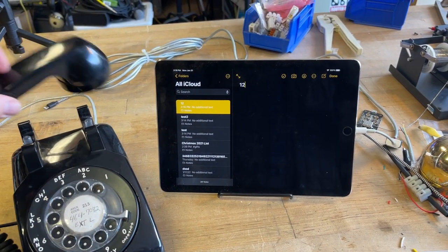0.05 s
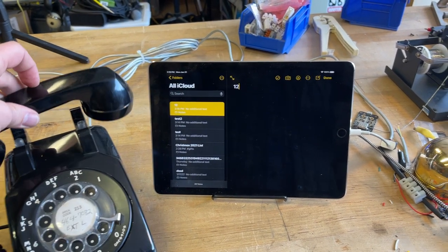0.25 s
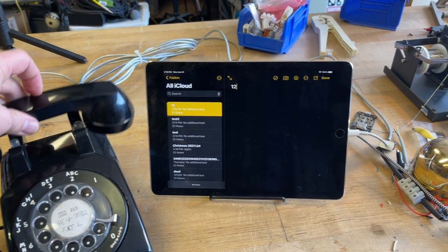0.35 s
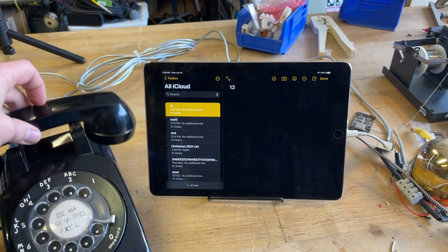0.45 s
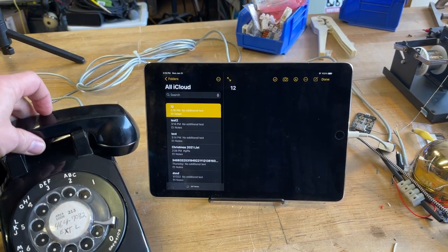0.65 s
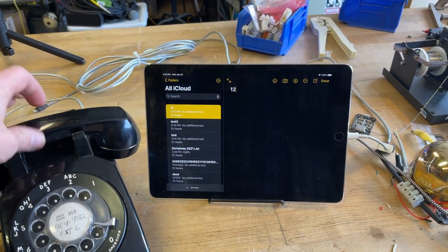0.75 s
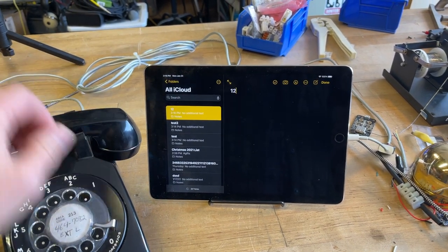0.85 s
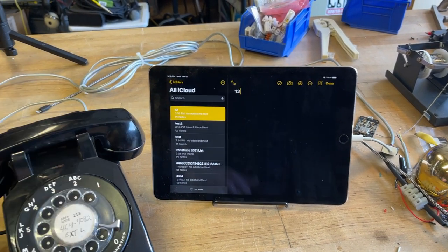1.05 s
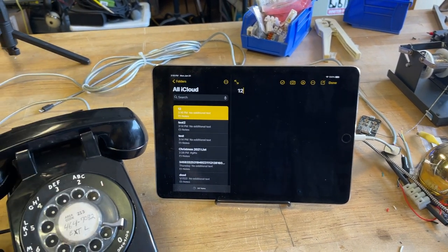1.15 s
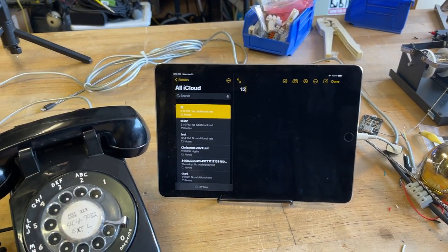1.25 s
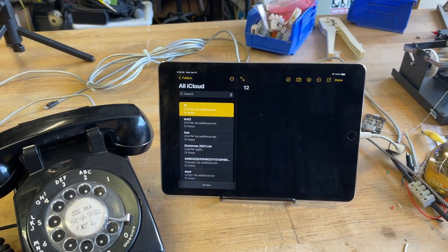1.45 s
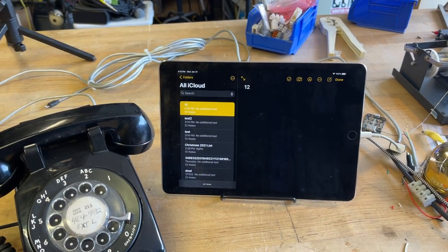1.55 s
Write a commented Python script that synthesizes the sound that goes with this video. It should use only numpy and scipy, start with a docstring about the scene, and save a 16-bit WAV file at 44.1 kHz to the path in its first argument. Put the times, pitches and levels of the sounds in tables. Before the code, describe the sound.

A heavy hollow plastic telephone handset is set down on its cradle: two sharp clacks, a cluster of smaller knocks and light rubbing, then quiet low room rumble, recorded close in stereo in a workshop.

```python
"""Telephone handset set down on its cradle

A heavy plastic handset is set down on its cradle on a wooden workbench: it knocks twice, scuffs over
the plungers, drops home and rocks to rest. Each knock rings the hollow shell with one push, while a quick
chatter of contacts rings small hard parts and cracks. The bench booms, noisy wakes follow the knocks and
rubbing is made of tiny slips. The room adds a dying tail, and a low rumble fills the workshop."""
import sys
import numpy as np
from scipy import signal
from scipy.fft import rfft, irfft, next_fast_len
from scipy.io import wavfile
from scipy.ndimage import uniform_filter1d

SR = 44100
rng = np.random.default_rng(int(sys.argv[2]) if len(sys.argv) > 2 else 0)


def wrap_up_sound(samples):
    """Save the sound to the file named by the first command line argument, as 16-bit audio."""
    columns = np.atleast_2d(samples).T
    # keep every value between -1 and 1, then stretch to whole-number steps
    tamed = np.clip(columns, -1, 1)
    steps = np.round(tamed * 32767).astype(np.int16)
    wavfile.write(sys.argv[1], SR, steps)


def decibels_to_gain(level_db):
    """Convert a level in decibels to a linear amplitude gain (20 dB per decade)."""
    exponent = np.asarray(level_db, float) / 20
    return 10 ** exponent


N = 70560  # length in samples (1.6 s)
SIZE = next_fast_len(N + SR)  # filter length, with space for tails
HZ = np.maximum(np.arange(SIZE // 2 + 1) * SR / SIZE, 1)

# Knocks on the cradle, a level for each pitch group:
# start_s, low_shell_db, upper_shell_db, middle_db, crack_db
KNOCKS = [(0.156, -57, -60.5, -53, -69.5), (0.244, -13, -14, -18, -21.5), (0.246, -15, -18, -36, -29),
          (0.255, -27.5, -32, -38, -23.5), (0.262, -28, -30, -34, -35), (0.436, -23.5, -20.5, -13.5, -26),
          (0.44, -11, -16, -31.5, -30), (0.442, -31.5, -30.5, -23, -32), (0.449, -30, -43, -33, -36),
          (0.584, -32, -28.5, -33.5, -40.5), (0.585, -24.5, -29.5, -21.5, -42),
          (0.619, -36, -47.5, -43.5, -52), (0.635, -39.5, -54, -34.5, -41.5),
          (0.696, -29, -42, -28.5, -46.5), (0.698, -33.5, -37, -42, -63), (0.75, -43.5, -21.5, -22, -27),
          (0.751, -13.5, -29, -23.5, -28.5), (0.761, -31.5, -31, -32.5, -36.5),
          (0.803, -54.5, -21.5, -23.5, -51), (0.804, -17, -23.5, -16.5, -31.5),
          (0.849, -24.5, -28, -30.5, -47), (0.853, -25.5, -22.5, -23, -43), (0.877, -30.5, -35, -32, -66),
          (0.896, -31.5, -42.5, -42, -62.5), (0.951, -26.5, -32, -38, -76), (1, -29.5, -33.5, -39.5, -69.5)]
# The pitch groups meet at these frequencies
UPPER_FROM_HZ, MIDDLE_FROM_HZ, HARD_FROM_HZ = 490, 750, 1800

# Ringing tones of the hollow shell and base: pitch_hz, level_db (relative), t60_s (time to fall 60 dB)
SHELL_TONES = [(300, -13, 0.0097), (348.5, -1.5, 0.054), (429, 3.5, 0.027), (557, 2.5, 0.039),
               (593, 1, 0.043), (654, -1, .035), (810, -10.5, 0.058), (889, 3.5, 0.028), (1003, 1, 0.054),
               (1046, 2, 0.032), (1174, -5, 0.017), (1490, -15, .018), (1662, -4.5, 0.014)]
# Ringing tones of small hard parts of the cradle: pitch_hz, level_db (relative), t60_s
HARD_TONES = [(2050, 2, 0.011), (2280, -19, .015), (2860, 3, 0.0055), (3260, -3, 0.01), (4500, -15, .012),
              (5940, -10, 0.036), (6330, -10.5, 0.021), (8000, -10, 0.005), (9300, -15, .012),
              (10400, -8, .01)]
# Added to the tone levels
SHELL_DB, UPPER_DB, MIDDLE_DB, HARD_DB = -3.5, -2.5, -3, -2
TONE_SPREAD_DB = 3  # random level change of each tone, knock by knock

# Colour of the crack noise: pitch_hz, level_db (per Hz, relative)
CRACK_COLOUR = [(880, -15), (1500, -1), (2240, -2), (3770, -14), (4550, -12), (6900, -20), (7540, -16.5),
                (11200, -19.5), (12500, -28.5), (16200, -67), (22000, -120)]
CRACK_T60_S = 0.03
CHATTER_S, CONTACT_DROP_DB = 0.0033, 14  # longest delay of a contact; most it can be weakened

# Small modes of base and bench top that blur into a dying noise: low_hz, high_hz, level_db, t60_s
BLUR_BANDS = [(270, 542, -9.5, 0.1), (463, 645, -9, 0.081), (770, 2080, -12, 0.15),
              (1800, 3000, -10.5, 0.14), (2570, 4900, -17.5, .08), (3830, 4000, -20, 0.063),
              (8230, 9300, -23, 0.17)]

# Booming tones of the bench: pitch_hz, level_db (relative to the push on the shell), t60_s
BENCH_TONES = [(104.9, -22.5, 0.51), (163.3, -20.5, 0.75), (201.2, -16.5, 0.26), (314, -21, 0.14)]
BENCH_SOFTEN_HZ = 127  # pushes are smoothed above this

# Hand, cord and handset rubbing as the handset is guided down and let go: start_s, level_db
RUB_LEVEL = [(0, -58), (0.044, -53), (.08, -88.5), (.22, -81), (.5, -69.5), (0.598, -56.5), (.65, -50.5),
             (.69, -47.5), (.74, -52), (.9, -56), (.96, -54.5), (1.05, -49.5), (1.12, -56), (1.19, -64.5)]
# Colour of the rubbing: pitch_hz, level_db (per Hz, relative)
RUB_COLOUR = [(250, -21.5), (400, 5.5), (560, 1.5), (1000, -8.5), (2500, -22.5), (5000, -39.5), (9000, -40),
              (12500, -44)]
SLIPS_PER_S, SLIP_SPREAD_DB = 7500, 1

# How long the room rings: pitch_hz, t60_s
ROOM_T60 = [(200, 0.76), (500, 0.26), (1500, 0.29), (3500, 0.26), (7000, 0.27), (12000, 0.26)]
# Tail energy against the direct sound; left-right likeness (0 to 1); time the tail takes to build up
ROOM_DB, ROOM_ALIKE, ROOM_START_S = -15.5, 0.27, 0.014

# Colour of the rumble: pitch_hz, level_db (per Hz, relative)
RUMBLE_COLOUR = [(22, -30), (31, -23), (39, -12), (62, 1), (100, -3), (160, -3), (250, -10), (310, -16),
                 (500, -21), (630, -27), (1000, -34), (1600, -41), (2500, -49), (4000, -54), (6300, -58),
                 (8500, -58), (12500, -62), (13500, -85)]
# Left-right likeness of the rumble: pitch_hz, likeness (0 to 1)
RUMBLE_ALIKE = [(60, .98), (240, .88), (950, .2), (3800, .2), (9000, .95)]
RUMBLE_DB = -45

# Overall tone of everything but the rumble, with the bass thinned and the treble cut off steeply
# above about 12.5 kHz: pitch_hz, level_db
OVERALL_TONE = [(20, -41.5), (45, -5.5), (70, -4), (12300, -2), (13000, -23), (14500, -16), (16000, -19)]
# How far the left microphone port leads the right: pitch_hz, phase_radians
LEFT_LEADS = [(0, 0), (1290, 1.0), (2840, 6.3), (5250, 7.4), (6630, 6.1), (7580, 7.5), (8790, 5.9),
              (11600, 0.4), (12600, -0.1), (13400, -3.0), (13800, -3.0), (14100, -4.6), (14900, -6.1),
              (16300, -6.2)]
# Left level over right, for everything but the rumble: pitch_hz, level_db
LEFT_OVER_RIGHT = [(60, -4), (110, 0.0), (200, 0.0), (380, 1), (700, 3.5), (1290, -3), (2380, -7),
                   (4400, 9), (8120, 1.5), (15000, -4)]


def at_hz(points, hz=HZ):
    """Reads a table between its points, on a log-frequency axis."""
    f, value = np.transpose(points)
    return np.interp(np.log(hz), np.log(np.maximum(f, 1)), value)


def shaped(x, response):
    """Filters a sound by a frequency response."""
    return irfft(rfft(x, SIZE) * response, SIZE)[..., :N]


def rms_one(x):
    """Scales a sound to an rms level of 1."""
    return x / np.sqrt(np.mean(x ** 2) + 1e-20)


def band_noise(noise, low, high):
    """Keeps the part of a noise between two frequencies."""
    return signal.sosfilt(signal.butter(2, [low, high], "band", fs=SR, output="sos"), noise)


def left_right(mid, side, alike):
    """Mixes two unrelated noises into left and right with a chosen likeness."""
    return np.sqrt(1 + alike) * mid + np.sqrt(1 - alike) * side * [[1], [-1]]


def fade_step(t60):
    """Factor per sample that makes a height fall 60 dB in t60 seconds."""
    return decibels_to_gain(-60 / (t60 * SR))


def dying(clicks, step):
    """Each click jumps up and then fades by a factor per sample."""
    return signal.lfilter([1], [1, -step], clicks + 1e-18)  # the tiny offset keeps the filter fast


def ring(clicks, hz, t60):
    """A click of size 1 sets off a dying sine that starts at height 1."""
    r, w = fade_step(t60), 2 * np.pi * hz / SR
    return signal.lfilter([0, np.sin(w)], [1, -2 * r * np.cos(w), r * r], clicks + 1e-18)


def train(at, sizes):
    """Places clicks of given sizes at given samples."""
    return np.bincount(at.ravel(), sizes.ravel(), N)[:N]


def knock_samples():
    """Sample at which each knock starts."""
    return (np.transpose(KNOCKS)[0] * SR).astype(int)


def group_of(hz):
    """Knock levels of the pitch group that a frequency belongs to."""
    group = int(np.searchsorted([UPPER_FROM_HZ, MIDDLE_FROM_HZ, HARD_FROM_HZ], hz))
    return np.transpose(KNOCKS)[1 + group]


def shell(first):
    """One push per knock sets the tones of the hollow shell ringing."""
    out = np.zeros(N)
    for k, (hz, db, t60) in enumerate(SHELL_TONES):
        if hz < UPPER_FROM_HZ:
            trim_db = SHELL_DB
        else:
            trim_db = UPPER_DB if hz < MIDDLE_FROM_HZ else MIDDLE_DB
        spread_db = TONE_SPREAD_DB * rng.standard_normal(len(first))
        pushes = train(first, decibels_to_gain(group_of(hz) + trim_db + db + spread_db))
        out += ring(pushes, hz, t60) * (-1) ** k  # every other tone starts downward
    return out


def contacts(first, count=4):
    """Each knock chatters through hard contacts that ring small parts and let out dying crack noise."""
    crack_db = np.transpose(KNOCKS)[4]
    # the first contact comes at once, the others shortly after
    delay_s = rng.random((len(first), count)) * (np.arange(count) > 0) * CHATTER_S
    at = first[:, None] + (delay_s * SR).astype(int)
    contact_db = crack_db[:, None] - CONTACT_DROP_DB * rng.random(at.shape)
    out = np.zeros(N)
    for hz, db, t60 in HARD_TONES:
        signs = rng.choice([-1, 1], at.shape)
        spread_db = TONE_SPREAD_DB * rng.standard_normal((len(first), 1))
        out += ring(train(at, signs * decibels_to_gain(contact_db + HARD_DB + db + spread_db)), hz, t60)
    crack_height = dying(train(at, decibels_to_gain(contact_db)), fade_step(CRACK_T60_S))
    hiss = rms_one(shaped(rng.standard_normal(N), decibels_to_gain(at_hz(CRACK_COLOUR))))
    return out + crack_height * hiss


def blur():
    """Many small modes blur together, so every knock leaves a noisy wake that dies band by band."""
    out = np.zeros(N)
    for low, high, db, t60 in BLUR_BANDS:
        level_db = group_of(np.sqrt(low * high)) + db
        power = dying(train(knock_samples(), decibels_to_gain(2 * level_db)), fade_step(t60) ** 2)
        power = uniform_filter1d(power, size=88, origin=43)  # average over the last 2 ms
        out += np.sqrt(np.abs(power)) * rms_one(band_noise(rng.standard_normal(N), low, high))
    return out


def bench(first):
    """The bench takes a softened copy of each push on the shell and booms."""
    pushes = train(first, decibels_to_gain(np.transpose(KNOCKS)[1]))
    r = np.exp(-2 * np.pi * BENCH_SOFTEN_HZ / SR)
    soft = signal.lfilter([1 - r], [1, -r], pushes)
    return sum(decibels_to_gain(db) * ring(soft, hz, t60) for hz, db, t60 in BENCH_TONES)


def rub():
    """Rubbing is a dense stream of tiny random slips, coloured by the shell."""
    happens = rng.random(N) < SLIPS_PER_S / SR
    sizes = rng.standard_normal(N) * decibels_to_gain(SLIP_SPREAD_DB * rng.exponential(1, N))
    scrape = rms_one(shaped(happens * sizes, decibels_to_gain(at_hz(RUB_COLOUR))))
    points = RUB_LEVEL + [(1.25, -100)]  # fades to almost nothing by 1.25 s
    level_db = np.interp(np.arange(N) / SR, *np.transpose(points))
    return decibels_to_gain(level_db) * scrape


def room(x):
    """Scattered echoes merge into a noisy tail that dies at its own pace in each band."""
    t = np.arange(SR * 3 // 4) / SR
    noise = left_right(*rng.standard_normal((2, len(t))), ROOM_ALIKE)
    edges = 70 * 2. ** np.arange(9)  # octave bands, Hz
    tail = 0
    for low, high in zip(edges, edges[1:]):
        t60 = at_hz(ROOM_T60, np.sqrt(low * high))
        tail = tail + band_noise(noise, low, high) * decibels_to_gain(-60 * t / t60)
    tail = tail * (1 - np.exp(-t / ROOM_START_S))
    answer = decibels_to_gain(ROOM_DB) * tail / np.sqrt((tail ** 2).sum() / 2)
    return shaped(x, rfft(answer, SIZE))


def rumble():
    """Steady low noise of the building, nearly alike on both sides in the deep bass."""
    mid, side = rfft(rng.standard_normal((2, SIZE))) * decibels_to_gain(at_hz(RUMBLE_COLOUR))
    both = left_right(mid, side, np.clip(at_hz(RUMBLE_ALIKE), 0, 1))
    return decibels_to_gain(RUMBLE_DB) * rms_one(irfft(both, SIZE)[:, :N])


def two_ports(sounds, background):
    """Left and right ports get the sounds with their own phase and level, the background with phase only."""
    phase = np.interp(HZ, *np.transpose(LEFT_LEADS))
    ports = np.exp(-1j * phase * [[0], [1]])
    levels = decibels_to_gain(at_hz(OVERALL_TONE) + at_hz(LEFT_OVER_RIGHT) * [[.5], [-.5]])
    return shaped(sounds, ports * levels) + shaped(background, ports)


def scene():
    """Handset and bench, direct and through the room, over the rumble."""
    first = knock_samples()
    near = shell(first) + contacts(first) + blur() + bench(first) + rub()
    return two_ports(near + room(near), rumble())


def top_cut(x):
    """Nothing passes above the cut-off."""
    return signal.sosfilt(signal.butter(12, 16670, fs=SR, output="sos"), x)


def record(dry):
    """Turns the finished mix into the final sound."""
    return top_cut(dry)


dry = scene()
out = record(dry)
wrap_up_sound(out)
```